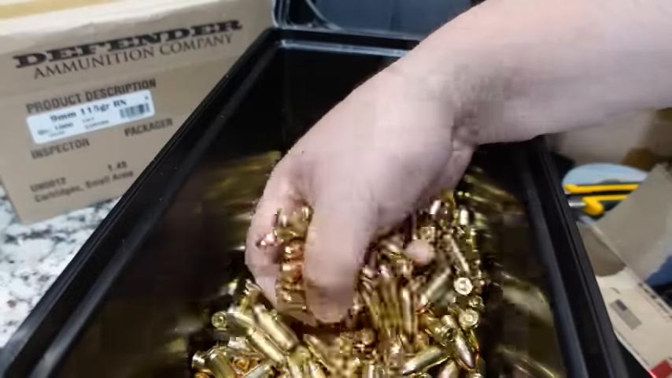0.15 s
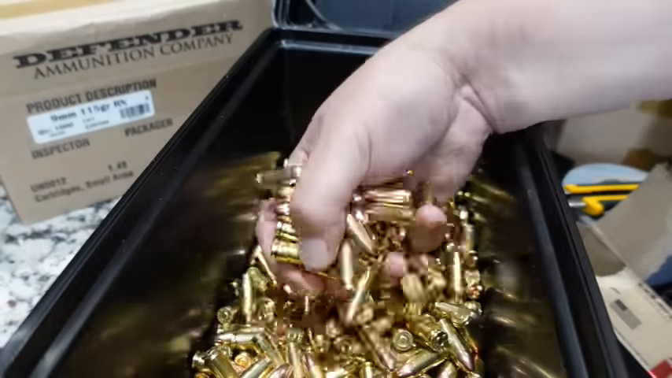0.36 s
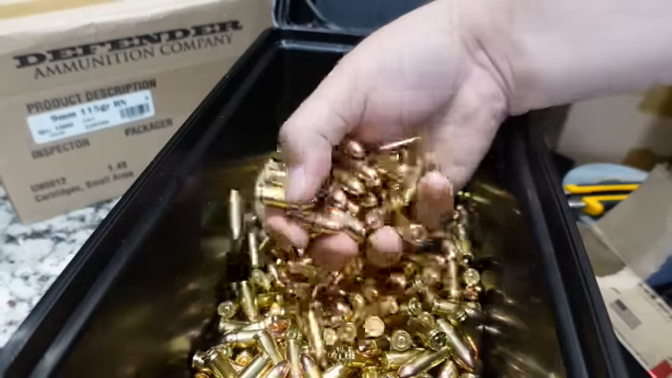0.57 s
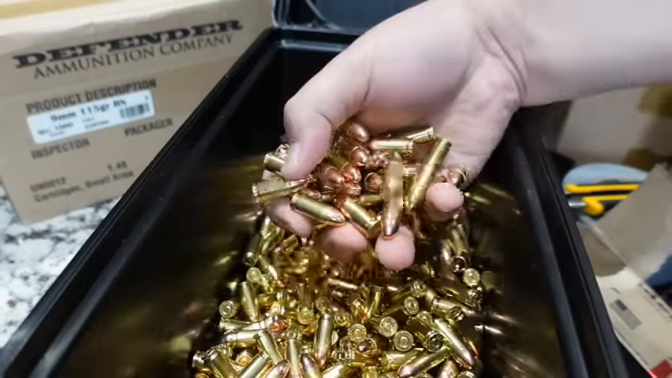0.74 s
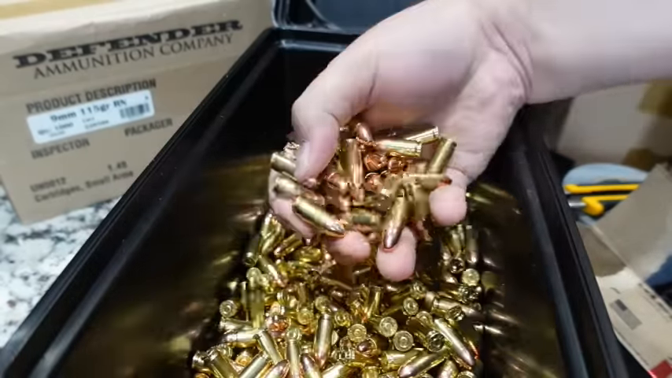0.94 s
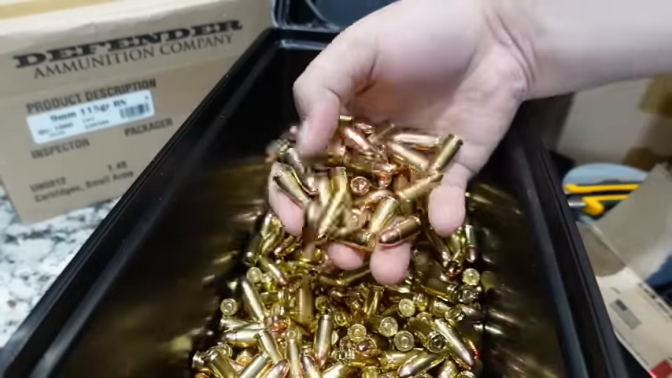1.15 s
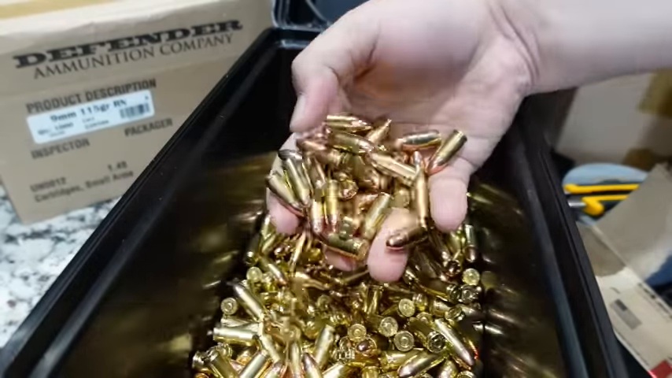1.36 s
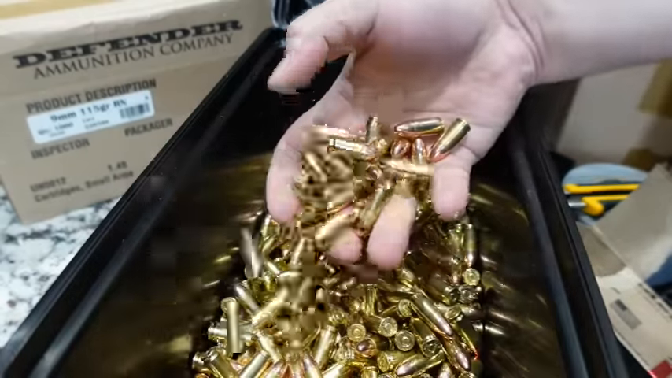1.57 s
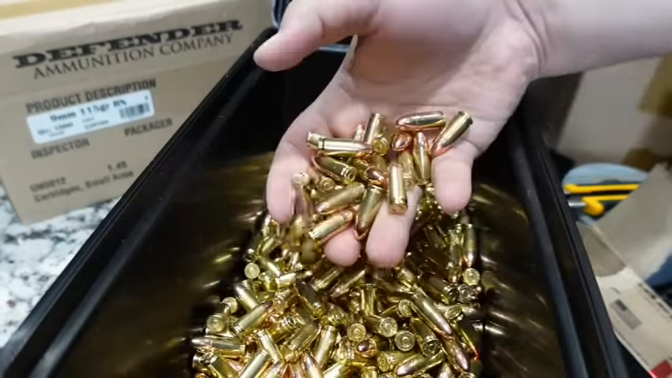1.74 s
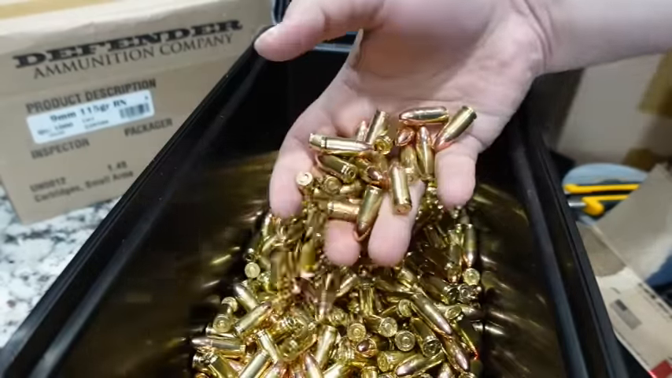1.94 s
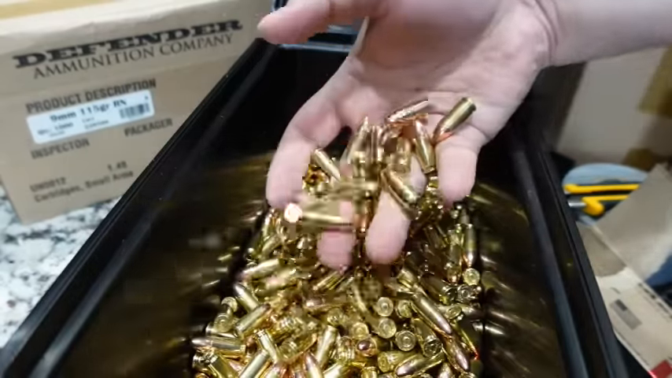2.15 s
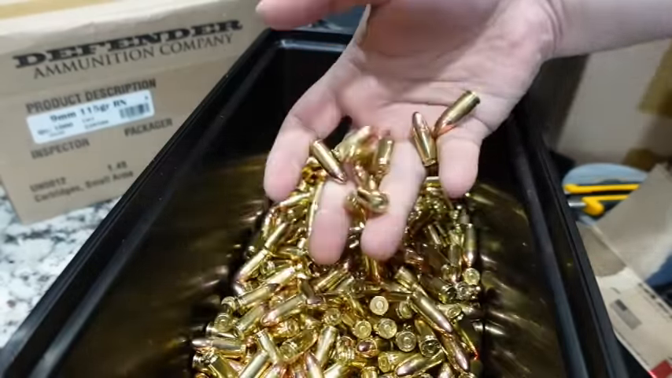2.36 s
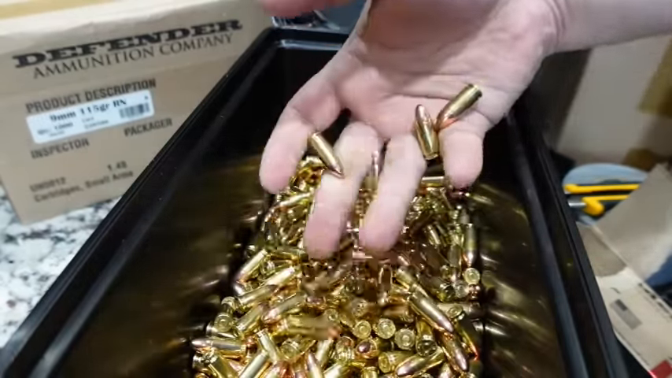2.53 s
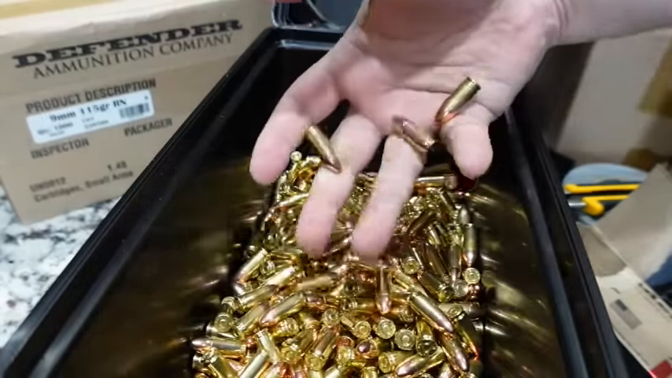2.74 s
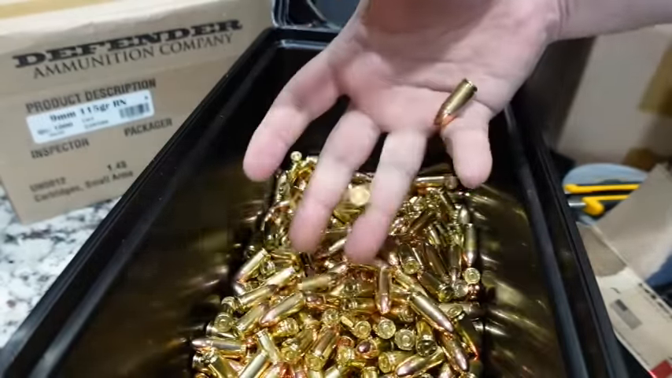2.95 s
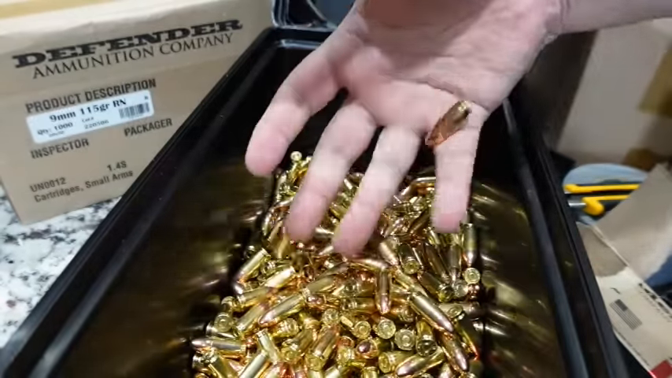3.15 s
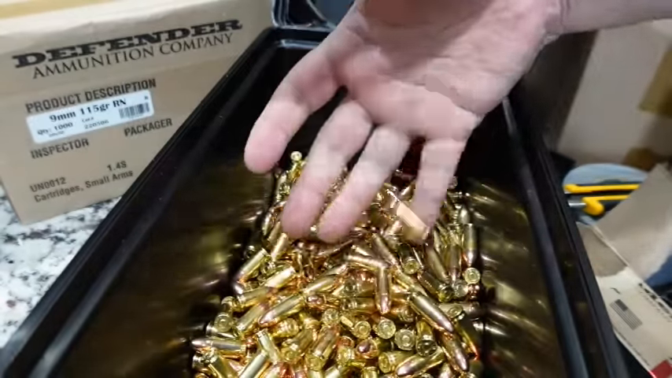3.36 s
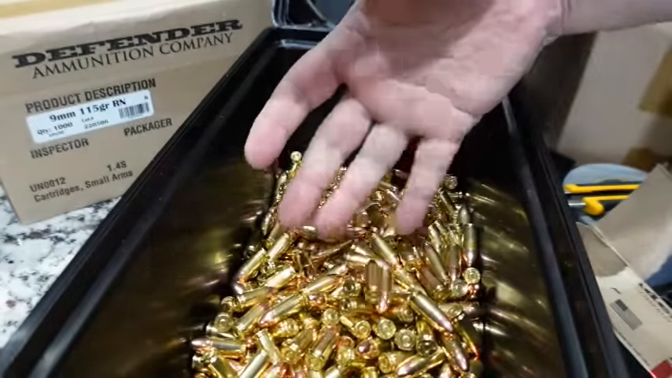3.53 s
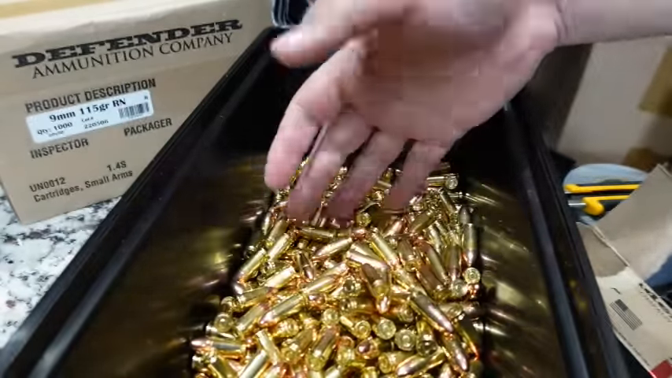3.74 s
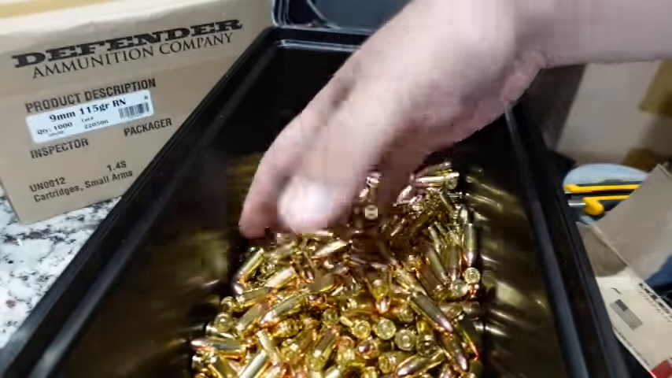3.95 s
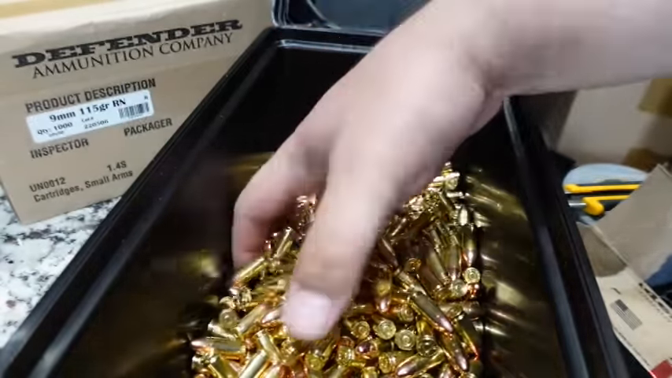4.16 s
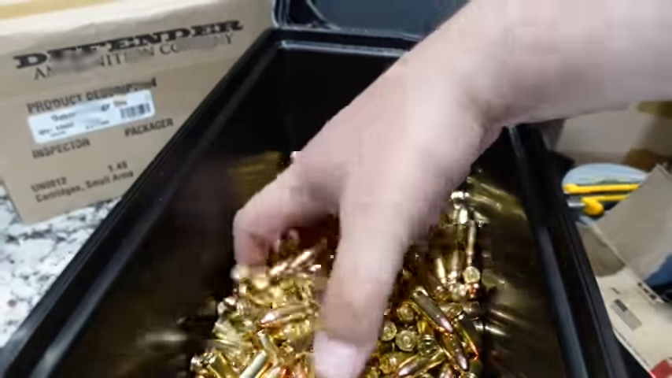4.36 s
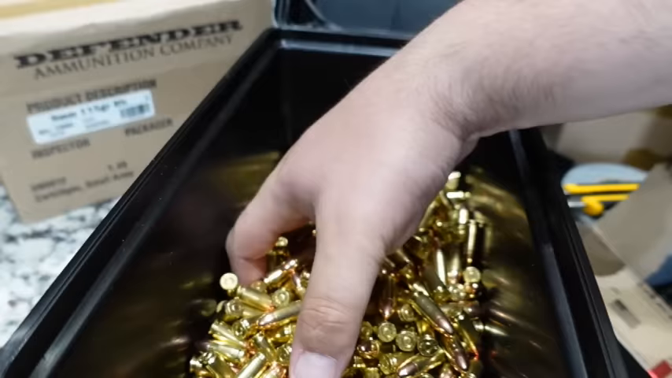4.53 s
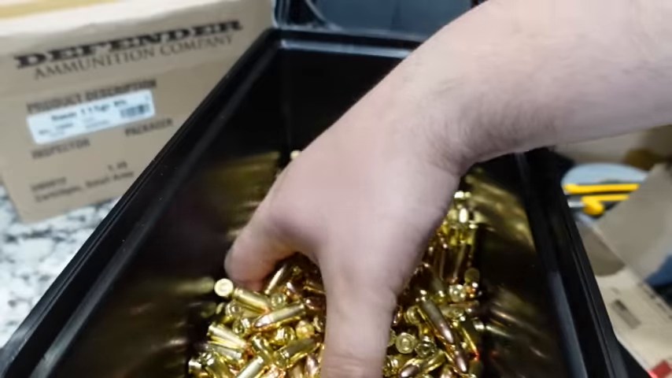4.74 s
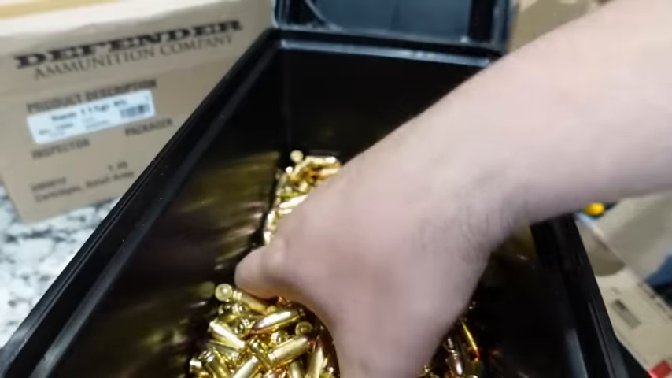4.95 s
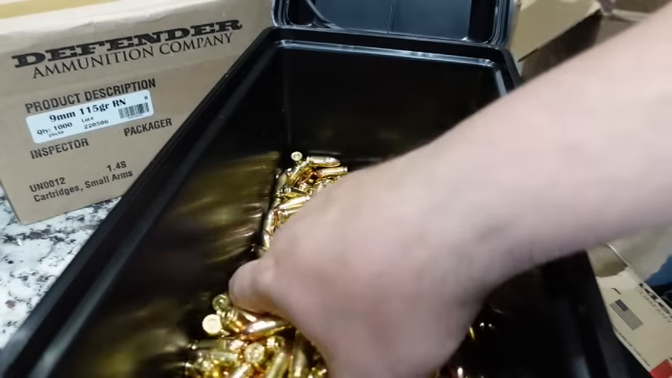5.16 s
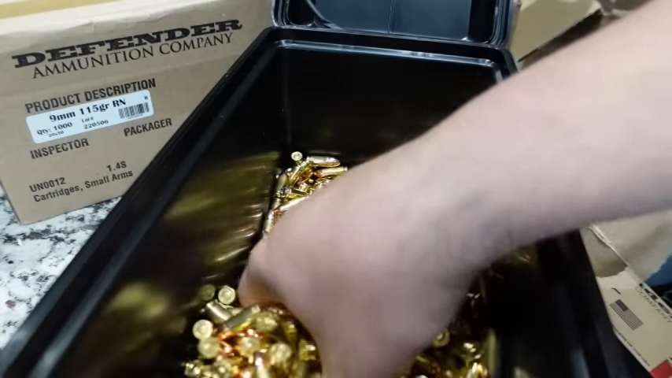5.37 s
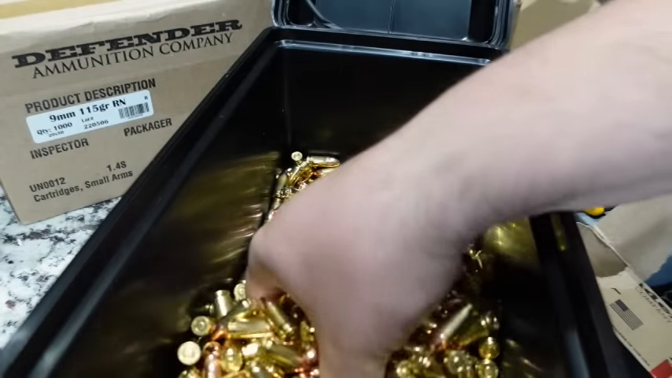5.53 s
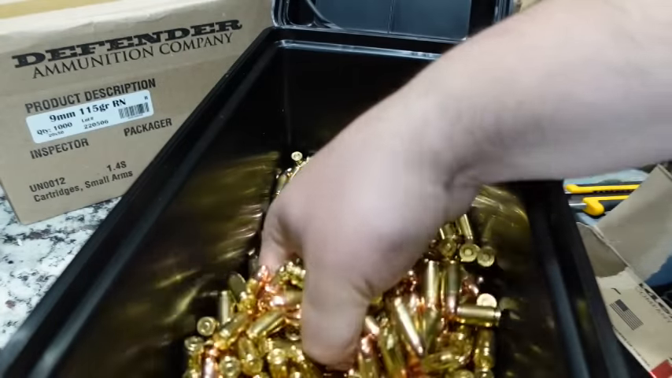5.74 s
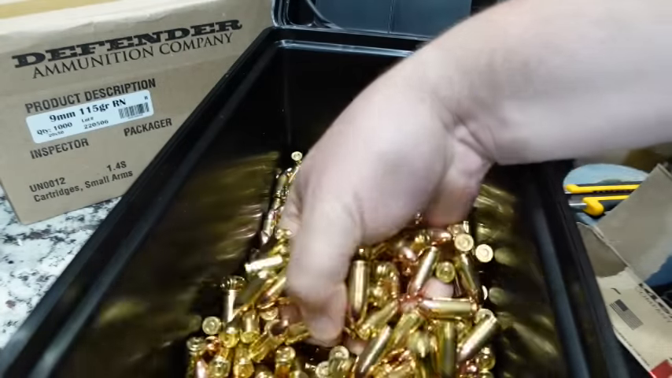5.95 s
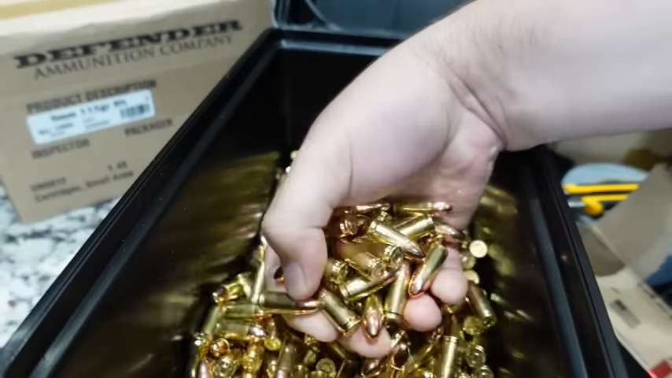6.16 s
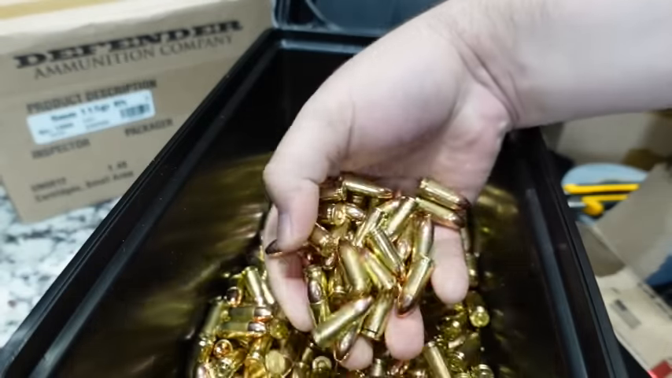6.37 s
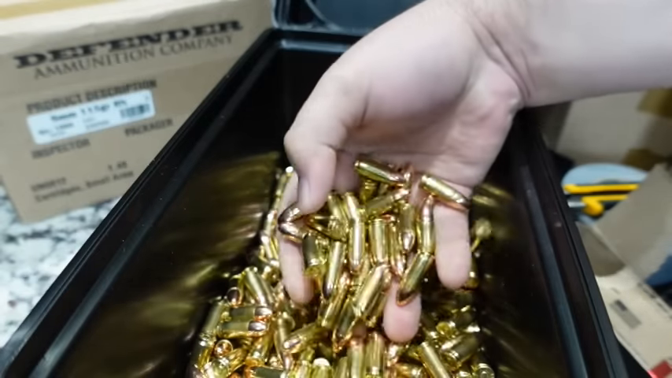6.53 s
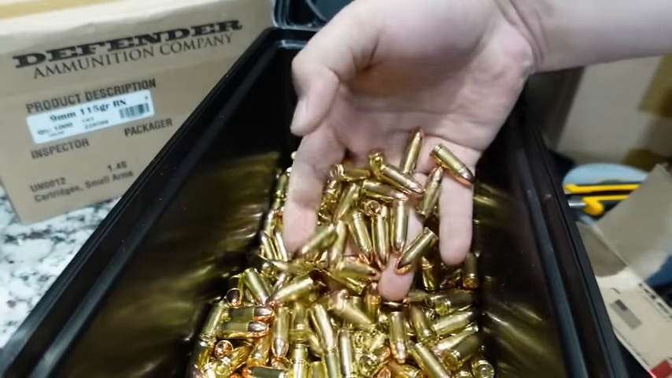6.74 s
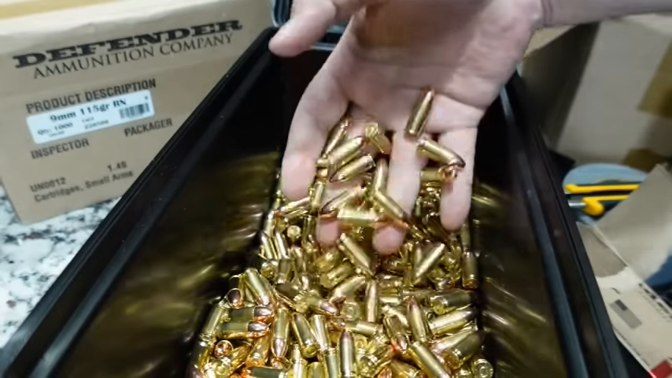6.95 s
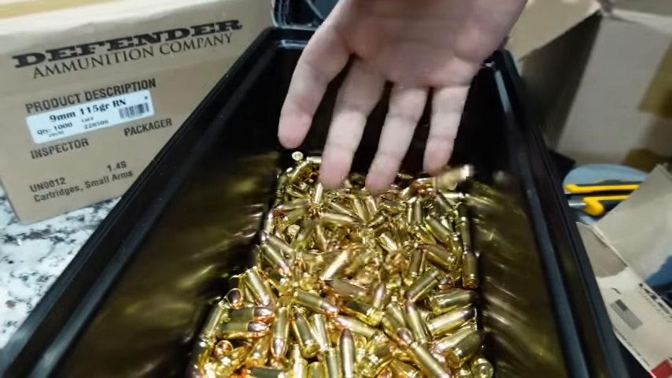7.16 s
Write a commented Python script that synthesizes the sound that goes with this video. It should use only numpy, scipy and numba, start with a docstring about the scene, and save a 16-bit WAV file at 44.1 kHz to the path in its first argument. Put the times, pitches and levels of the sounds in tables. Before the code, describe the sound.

Close-up indoor handling of loose brass cartridges in a plastic can, dry and bright with a short hollow boxy resonance. From 0 to 0.45 s a hand churns the heap in a dense rattle and lifts a handful. From 0.5 to 2.65 s cartridges drop back in quick, irregular hard clacks and high ticks, strongest around 0.5-1.3 s. It thins to faint stray clinks by 2.7-2.9 s, then scattered small drops until 3.55 s and a near-silent gap with faint hum. From 3.75 s light rustling ticks grow as fingers dig in; a dull low knock on the can floor comes near 4.36 s. Brief scrapes follow, then thick, loud, gritty churning from about 4.9 to 6.3 s. Separate clacks spill again from 6.05 to 6.7 s, with a last loud tumble just after 7 s. Small-room tail throughout.

```python
"""Dry cracks and a churning rattle: a hand digs into loose brass cartridges in a plastic can, lifts
a handful and lets them drop back, twice. Each contact is a short burst of noise with case rings;
decaying modes sound the can's walls, floor and air. A knock on the can floor is heard on the way.
Behind lie a small room, as a decaying noise tail, and a faint hum, as steady coloured noise.
The microphone pair is close, and a limiter holds the peaks down."""
import sys
import numpy as np
from scipy import signal
from scipy.fft import rfft, irfft, next_fast_len
from scipy.io import wavfile
from scipy.ndimage import uniform_filter1d
from numba import njit

SR = 44100
rng = np.random.default_rng(int(sys.argv[2]) if len(sys.argv) > 2 else 0)


def file_out(sig):
    """Save sig as 16-bit WAV at sys.argv[1]."""
    # one column per channel
    cols = np.atleast_2d(sig).T
    # limit, then scale
    lim = np.clip(cols, -1, 1)
    pcm = np.round(lim * 32767).astype(np.int16)
    wavfile.write(sys.argv[1], SR, pcm)


N = 317383   # samples in the scene
SPOTS, RING = 160, 2048   # places in the heap; samples generated for one contact
ONSET = 441   # samples in the first 10 ms
STEP = 32   # samples between updates of the hand's motion


def from_db(db):
    """dB to gain."""
    return 10 ** (np.asarray(db) / 20)


def rms_one(x):
    """Scale to rms 1."""
    return x / np.sqrt(np.mean(x ** 2) + 1e-20)


def energy_one(rows):
    """Scale so that the rows have a mean energy of 1."""
    return rows / np.sqrt(np.mean(np.sum(rows ** 2, axis=-1)))


def coloured(size, spectrum, count):
    """Rows of noise with the given spectrum, interpolated over log frequency."""
    hz = np.maximum(np.fft.rfftfreq(size, 1 / SR), 10)
    table = np.array(spectrum)
    gain = from_db(np.interp(np.log(hz), np.log(table[:, 0]), table[:, 1]))
    return irfft(rfft(rng.standard_normal((count, size))) * gain, size)


def dying(t60):
    """Envelope of one contact that falls 60 dB in t60 seconds."""
    return from_db(-60 * np.arange(RING) / SR / t60)


# The hum behind the can, as a noise spectrum. Each row: frequency in Hz, relative density in dB per Hz.
HUM_SPECTRUM = [(18, -20), (30, -17), (60, -34), (125, 2.5), (200, -4.5), (260, -5), (1200, -3),
                (2800, -10), (8700, -22), (16000, -48)]
HUM_DB = -48   # rms before the bass and treble cuts


def background_hum():
    """Steady coloured noise, partly different at the two microphones."""
    mid, side = coloured(next_fast_len(N), HUM_SPECTRUM, count=2)[:, :N]
    return from_db(HUM_DB) * rms_one(mid + 0.51 * side * [[1], [-1]])


ROOM_T60_S, ROOM_DB, WALL_CUT_HZ = 0.37, -20, 3500


def room(close):
    """A decaying noise tail, duller than the direct sound, nearly alike at both microphones."""
    t = np.arange(SR // 3) / SR
    envelope = from_db(-60 * t / ROOM_T60_S) * (t > 0.008)   # the tail starts after 8 ms
    mid, side = rng.standard_normal((2, len(t))) * envelope
    dull = signal.butter(1, WALL_CUT_HZ, fs=SR, output="sos")
    tail = signal.sosfilt(dull, mid + 0.14 * side * [[1], [-1]])
    return from_db(ROOM_DB) * signal.oaconvolve(close[None], energy_one(tail), axes=1)[:, :N]


BUMP_S = 4.358   # fingers strike the can floor
# The struck can floor, close by. Each row: frequency in Hz, level in dB, time to fall 60 dB in seconds.
BUMP_MODES = [(137, -31, 0.2), (285, -8.5, 0.023), (490, -12.5, 0.08)]


def hand_bump():
    """A dull knock on the can floor: decaying modes that take a moment to swing."""
    t = np.maximum(np.arange(N) / SR - BUMP_S, 0)
    knock = 0
    for hz, level_db, t60 in BUMP_MODES:
        knock = knock + from_db(level_db - 60 * t / t60) * np.sin(2 * np.pi * hz * t)
    return (1 - from_db(-60 * t / 0.0066)) * knock


def cracks(spectrum, crack_t60, echo_t60, echo_db, top_hz):
    """Each spot's own crack: a sharp snap, a brief burst and slower wall echoes, rolled off above top_hz."""
    shape = dying(0.0046) + dying(crack_t60) + from_db(echo_db) * dying(echo_t60)
    rounded = signal.butter(3, top_hz, fs=SR, output="sos")
    return energy_one(signal.sosfilt(rounded, coloured(RING, spectrum, count=SPOTS) * shape))


def ringing(modes, scatter_db, detune, tilt_db=0):
    """Each spot excites every mode with its own strength and detuning; a tilt makes early spots deeper."""
    out, t = 0, np.arange(RING) / SR
    height = np.linspace(-1, 1, SPOTS)[:, None]
    for hz, level_db, t60 in modes:
        strength, shift, sign = rng.standard_normal((3, SPOTS, 1))
        wave = np.sin(2 * np.pi * hz * (1 + detune * shift) * t) * np.sign(sign)
        tilted_db = tilt_db * height * np.log2(hz / modes[0][0])
        out = out + from_db(level_db + scatter_db * strength + tilted_db) * wave * dying(t60)
    if tilt_db:
        return out / np.linalg.norm(out, axis=1, keepdims=True)   # every spot equally strong
    return energy_one(out)


def small_radiator(rows, hz):
    """A small body radiates little below its lowest mode."""
    return energy_one(signal.sosfilt(signal.butter(3, hz, "high", fs=SR, output="sos"), rows))


# Brass contact noise heard close: the main clack, the brighter tick and the finest sheen.
# Each row: frequency in Hz, relative density in dB per Hz.
CLACK_SPECTRUM = [(800, -3.5), (1500, -10.5), (2200, 0.5), (3000, 2.5), (4200, 1), (5500, -5.5),
                  (8000, -45)]
TICK_SPECTRUM = [(3500, -31), (5500, 5.5), (7500, 6), (9500, 0), (12500, -24)]
SHEEN_SPECTRUM = [(7500, -21), (10000, 1), (12500, -7), (15000, -12), (16500, -32)]
# Resonances of the brass cases, the can's upper air, its low walls and its floor.
# Each row: frequency in Hz, relative level in dB, time to fall 60 dB in seconds.
CASE_MODES = [(2620, 5, 0.022), (3150, 0, 0.013), (3750, 2, 0.016)]
AIR_MODES = [(1162, -7.5, 0.031), (1543, -2, 0.026), (1654, -3.5, 0.02), (1914, -2, 0.021)]
WALL_MODES = [(336, -20, 0.037), (412.6, -8, 0.039), (479, -2, 0.038), (619, -2, 0.025), (697.8, -3, 0.048),
              (767, 5.5, 0.0096)]
FLOOR_MODES = [(130, -3, 0.21), (216.6, 2, 0.13), (299, 23.5, 0.037)]


def brass():
    """The clack, can air, boom, tick, sheen and floor thud of a contact at every spot."""
    swing = 1 - dying(0.012)   # the walls take a moment to swing
    cases = ringing(CASE_MODES, scatter_db=5.5, detune=0.05)   # no two cases ring alike
    snap = cracks(CLACK_SPECTRUM, 0.018, 0.075, echo_db=-16, top_hz=7700)
    # the shifting load detunes the can's modes
    air = ringing(AIR_MODES, scatter_db=3.0, detune=0.033)
    walls = ringing(WALL_MODES, scatter_db=4.0, detune=0.044, tilt_db=13.0)
    floor = ringing(FLOOR_MODES, scatter_db=4.0, detune=0.043)
    return np.array([small_radiator(snap + from_db(-6) * cases, hz=920),
                     small_radiator(air, hz=750),
                     small_radiator(walls * swing, hz=307),
                     cracks(TICK_SPECTRUM, 0.016, 0.15, echo_db=-19.0, top_hz=10500),
                     cracks(SHEEN_SPECTRUM, 0.013, 0.044, echo_db=-12, top_hz=14700),
                     small_radiator(floor * swing, hz=110)])


# Movements of the hand in the heap or shaking a handful out, close to the microphones.
# Each row: start in seconds, length in seconds, clack level in dB at start, clack level in dB at end,
# depth from 0 open to 1 buried, boom against clack in dB, floor thud against boom in dB.
HAND_STIRS = [(-0.04, 0.47, -10.5, -14.5, 0.71, -7, -24), (0.424, 0.35, -18, -18, 0.14, -6, -16.5),
              (0.89, 0.15, -44, -18, 0.15, -12, -23), (1.21, 0.24, -18, -27.5, 0.066, -5.5, -14.5),
              (1.444, 0.53, -10, -38.5, 0.13, -4.5, -24), (1.808, 0.11, -57, -21.5, 0.05, -3.5, -21),
              (1.987, 0.11, -50, -21, 0.041, -17, -22), (2.136, 0.39, -18, -20.5, .1, -4, -22),
              (2.96, 0.56, -57, -44.5, 0.35, 3, -17.5), (3.799, 0.069, -29.5, -29, 1, -6, -15),
              (3.906, 0.23, -24.5, -20, 1, -10.5, -18.5), (4.19, 0.085, -16, -13, 1, -9.5, -23),
              (4.335, 0.058, -7, -14.5, 0.75, -8, -24), (4.582, 0.04, -17, -15.5, 0.99, -8, -21.5),
              (4.8, 0.2, -26.5, -10.5, 1, -6, -24), (5.103, 0.51, -14.5, -9, 0.98, -9, -31),
              (5.633, 0.32, -9, -12.5, 0.81, -7.5, -37), (5.958, 0.35, -8.5, -20.5, 0.71, -4, -22),
              (6.387, 0.4, -26.5, -18.5, 0.23, -8, -25.5), (6.66, 0.41, -24, -16.5, 0.3, -6.5, -31),
              (7.048, 0.19, -5, -20, 0.37, -10.5, -37)]
STIR_ATTACK_S, STIR_RELEASE_DB_S = 0.05, 126


def motion():
    """Clack power of the stirring, with depth, boom and thud weighted by each stir's power."""
    t, powers = np.arange(1, N + STEP, STEP) / SR, []
    for start, length, first_db, last_db, *_ in HAND_STIRS:
        level_db = np.interp(t, [start, start + length], [first_db, last_db])
        level_db -= STIR_RELEASE_DB_S * np.maximum(t - start - length, 0)
        attack = np.clip((t - start) / STIR_ATTACK_S, 0, 1)
        powers.append((from_db(level_db) * attack) ** 2)
    stirring = np.sum(powers, axis=0) + 1e-90
    manner = np.array(HAND_STIRS)[:, 4:].T @ powers / stirring
    return np.repeat([stirring, *manner], STEP, axis=1)[:, :N]


LUMPS_PER_S, LUMP_DB = 35, 3


def lumps():
    """The heap gives way in lumps: a random swell of the churn's power, mean 1."""
    knots = rng.standard_normal(N // STEP)
    swell = np.interp(np.arange(N) / SR * LUMPS_PER_S, np.arange(len(knots)), knots)
    return rms_one(from_db(LUMP_DB * swell)) ** 2


SETTLE_DB, SETTLE_T60_S = -10, 0.18   # energy of the rattle against the landing's; its decay


def settling(starts, gains):
    """Power of each part as neighbours rattle on after every landing, in that landing's colour."""
    kicks = np.full((len(gains), N), 1e-18)
    kicks[:, starts] = (gains * from_db(SETTLE_DB)) ** 2
    keep = from_db(-2 * 60 / SETTLE_T60_S / SR)   # power kept from sample to sample
    return signal.lfilter([1 - keep], [1, -keep], kicks)


# Pairs: fingers in the open, fingers buried deep
CONTACTS_PER_S = (600, 1800)
TICK_DB = (-2.5, -8.5)   # against the clack
SHEEN_DB = (-5, -11)   # against the tick
# Can air heard while stirring. Each row: time in seconds, level against the boom in dB.
STIR_AIR = [(0, 1.5), (2.6, 2.5), (4.0, 0), (5.5, 0.5), (6.1, 2.5), (6.6, -3), (7.2, 4.5)]


def churn(state, settle, spread_db, colour_db, rim_db):
    """Start and part gains of small contacts: random in time, most weak, a few strong, each coloured."""
    per_s = np.interp(state[1], [0, 1], CONTACTS_PER_S)
    starts = np.flatnonzero(rng.random(N) < per_s / SR)
    size = rng.exponential(1, N)[starts]
    tilt, top, rim = rng.standard_normal((3, N))[:, starts]
    stirring, buried, boom_db, thud_db = (curve[starts] for curve in state)
    tick_db = np.interp(buried, [0, 1], TICK_DB)
    sheen_db = tick_db + np.interp(buried, [0, 1], SHEEN_DB)
    air_db = boom_db + np.interp(starts / SR, *np.transpose(STIR_AIR))
    parts_db = [0 * boom_db, air_db, boom_db, tick_db, sheen_db, boom_db + thud_db]
    power = stirring * lumps()[starts] * from_db(parts_db) ** 2
    size = rms_one(from_db(spread_db * np.minimum(size, 4)))
    hollow = rms_one(from_db(colour_db * tilt))   # contacts near the walls wake the can more
    exposed = rms_one(from_db(colour_db * top))   # bright ticks come mostly from the open top of the heap
    glancing = rms_one(from_db(rim_db * rim))   # rim on rim gives the finest sheen
    colour = np.array([1 + 0 * size, hollow, hollow, exposed, exposed * glancing, hollow])
    total = power * (size * colour) ** 2 + settle[:, starts]   # the settling is even
    return starts, np.sqrt(total * SR / per_s[starts])


# Single cartridges landing in the can, close by, before room and limiter. Each row: time in seconds,
# clack peak in dB, then boom, tick and can air, each in dB as rms of the first 10 ms.
LANDINGS = [(0.088, -2, -14, -27, -18), (0.122, 0, -24.5, -22, -22), (0.2152, 2, -16.5, -18, -15),
            (0.314, -7, -12, -25, -17), (0.387, -11, -24.5, -14, -25), (0.491, 1, -13, -21, -19),
            (0.5148, 4, -4.5, -12, -11), (0.5328, -2, -13, -10, -14), (0.5564, 9.5, -16.5, -14, -12),
            (0.5808, 4, -10, -29, -15), (0.615, -1, -12, -21, -17), (0.6343, 0, -10, -27, -15),
            (0.661, 5, -12.5, -17, -8.5), (0.726, 0, -19.5, -25, -24), (0.738, 6.5, -13.5, -26, -17),
            (0.76, 6.5, -26, -21, -25), (0.7955, 0, -44, -18, -23), (0.8316, 6, -30, -18, -16),
            (0.858, 3, -11.5, -31, -10), (0.88, -4, -12, -22, -9.5), (0.9, 2, -14.5, -20, -13),
            (0.9358, -10, -24.5, -23, -28), (0.951, -2, -9.5, -27, -11), (0.964, 3.5, -16, -18.5, -14),
            (0.9971, -7, -15.5, -24, -16), (1.0191, 2, -13, -19, -14.5), (1.051, -13, -22, -15, -19),
            (1.076, 0.5, -16.5, -19, -16), (1.1025, -0.5, -18, -16.5, -17.5), (1.135, -20, -45, -32, -39),
            (1.1935, 1, -24.5, -10, -18), (1.2335, 2, -17.5, -16, -13), (1.239, 5, -11, -18, -15),
            (1.26, 7, -10.5, -15, -7.5), (1.291, 2, -13.5, -19, -16), (1.3304, -4, -25, -24, -20),
            (1.3593, -3, -22.5, -22, -21), (1.385, 0, -29, -13, -16), (1.4158, -6, -35, -25, -17),
            (1.4344, -6.5, -43, -29, -22), (1.4659, 4, -10, -20, -7.5), (1.5184, 0, -30, -23, -28),
            (1.5658, 4, -17, -31, -13), (1.598, -4, -20.5, -12.5, -13), (1.6167, 3, -11.5, -27, -17.5),
            (1.649, 0, -17, -19, -26), (1.6842, -2, -27.5, -18.5, -19), (1.721, 0, -14.5, -22, -15.5),
            (1.737, -8, -25, -23, -15), (1.7771, -6, -42, -29, -29), (1.796, -3.5, -33, -41, -29),
            (1.8266, -3, -26, -17.5, -16.5), (1.866, 3, -21.5, -14, -19), (1.869, -1, -32, -22, -16.5),
            (1.9215, 1, -18.5, -20, -16), (1.9833, 2, -19, -14, -8.5), (2.009, 1, -10.5, -22, -20),
            (2.0376, -1, -25, -23, -29), (2.0599, -5, -13.5, -22.5, -20), (2.0972, -7, -19, -16.5, -15.5),
            (2.127, -5, -21, -10, -22), (2.165, 7, -14, -14.5, -10), (2.1995, 3, -30, -15, -26),
            (2.2157, 2.5, -17, -22, -28), (2.2357, -6, -16.5, -30, -26), (2.295, 4, -20, -14, -25),
            (2.316, 4, -30, -22, -20), (2.3264, -3, -19.5, -19, -20), (2.4055, 1.5, -16.5, -13, -16),
            (2.429, -7, -15, -15, -22), (2.4436, 1, -18, -12, -20), (2.5365, -3, -30, -14, -26),
            (2.5886, -2, -22, -18, -31), (2.6, 5.5, -19.5, -16, -10.5), (2.6218, -1, -18.5, -18, -25),
            (2.629, -2, -20.5, -28, -22), (2.654, 1.5, -22, -11, -18), (2.6775, -13, -29, -33, -31),
            (2.7113, -14, -33, -32, -31), (2.7293, -15, -35, -48, -40), (2.758, -13, -31.5, -31.5, -33),
            (2.776, -24, -32, -48, -29), (2.796, -7, -28.5, -41, -37.5), (2.8066, -21.5, -43, -43, -29.5),
            (2.8615, -21.5, -40, -42, -39), (2.9053, -24, -43, -46, -41), (2.996, -2, -23.5, -21, -24),
            (3.015, -14, -27, -39, -34), (3.021, -4, -25, -22, -19), (3.0445, -1, -23, -14.5, -19),
            (3.0723, -17, -37, -36, -29), (3.0943, 2.5, -18, -18.5, -18.5), (3.1205, -14, -31, -34, -44),
            (3.151, -22, -47, -34, -37), (3.1785, -2, -23, -28, -27), (3.2062, -2.5, -22, -27, -24),
            (3.2559, -10.5, -35, -33.5, -28), (3.263, -15, -50, -49, -46), (3.274, -25, -47, -53, -33),
            (3.3519, -9, -20.5, -32.5, -27), (3.39, -12, -40, -56, -34), (3.401, -12, -31, -23.5, -33),
            (3.4135, -4, -23, -14, -11.5), (3.417, -6, -34, -18, -26), (3.431, -19, -48, -41, -33),
            (3.465, -21, -41, -35, -32), (3.4982, -18, -32, -37, -33), (3.5099, -8.5, -27, -27.5, -20.5),
            (3.524, -22, -36, -30, -34), (3.5469, -15, -34, -30.5, -24), (3.7668, -25, -58, -51, -50),
            (3.786, -25, -49, -47, -42), (3.8048, -14.5, -33, -42, -44), (3.82, -6.5, -40, -33, -42),
            (3.832, -11, -40, -36, -42), (3.846, -18, -38, -39, -42), (3.8647, -12, -41, -31, -38),
            (3.8792, -13, -29.5, -49, -30), (3.924, -7, -32, -27, -29), (3.934, -8, -26.5, -32, -34),
            (3.978, -13, -33, -39, -43), (3.989, -10, -40, -36, -45), (4.0026, -8, -37, -22, -32),
            (4.0358, -11, -27.5, -29, -42), (4.0748, -7, -32.5, -41, -38), (4.0935, 1, -44, -25, -27),
            (4.1114, -4, -27, -21, -18), (4.146, -6, -29.5, -30, -35), (4.1823, 4.5, -25.5, -20, -13),
            (4.19, 4, -13.5, -16, -21), (4.209, -2, -27, -25, -22), (4.23, -5, -34, -17, -31),
            (4.344, -7, -25, -23, -27), (4.3949, -2, -15.5, -22, -29), (4.421, 4, -13.5, -19, -25),
            (4.4476, -18, -33, -33, -36), (4.51, -15, -40, -49, -45), (4.607, -1.5, -42, -24, -23),
            (4.6328, -1, -33, -26, -36), (4.812, -17, -41, -37, -46), (4.8412, 5.5, -18.5, -17, -47),
            (4.903, -1.5, -21, -22, -25), (5.093, 5, -19, -27, -15.5), (5.1294, 4.5, -16, -23, -19),
            (6.058, 2, -19, -22, -18), (6.1205, -4, -35, -20.5, -20), (6.1591, 1, -17, -22, -23),
            (6.2114, -6, -17.5, -17, -11), (6.251, -9, -37, -17.5, -11), (6.2962, 0, -17.5, -19, -23),
            (6.3236, -7.5, -19.5, -26, -19.5), (6.3767, -2, -20, -13, -23), (6.385, 0, -13, -23, -13),
            (6.395, -5, -32, -12, -26), (6.409, 0, -13, -26, -15.5), (6.4417, -2, -13, -18, -14),
            (6.4702, -2, -34, -13.5, -21), (6.503, -4, -19.5, -15.5, -34), (6.5237, -2, -12, -25, -15),
            (6.553, -8, -13, -22, -12), (6.576, 0, -16, -19, -14), (6.596, -7, -21, -32, -17),
            (6.6195, 0, -22, -21, -13.5), (6.6392, 1.5, -18, -25, -25), (6.671, -5, -30, -36, -26),
            (6.6999, 2, -23, -28, -29), (6.898, -1, -29, -13, -22), (6.9133, 0, -13.5, -8.5, -19),
            (6.978, -7.5, -43, -15, -19), (7.0485, -3, -22.5, -13, -22), (7.0863, -18, -20, -24, -22)]
DROP_SHEEN_DB, DROP_THUD_DB = -3, 2.5   # against the churn's shares of sheen and thud


def drops(state, sounds, spot):
    """Start and part gains of the single landings, each part scaled by its spot's own loudness."""
    s, clack_db, boom_db, tick_db, air_db = np.transpose(LANDINGS)
    starts = np.round(s * SR).astype(np.int64)
    sheen_db = tick_db + np.interp(state[1][starts], [0, 1], SHEEN_DB) + DROP_SHEEN_DB
    thud_db = boom_db + state[3][starts] + DROP_THUD_DB
    levels_db = [clack_db, air_db, boom_db, tick_db, sheen_db, thud_db]
    own = np.sqrt(np.mean(sounds[..., :ONSET] ** 2, axis=2))   # how loud each spot sounds by itself
    own[0] = np.abs(sounds[0]).max(axis=1)   # clacks go by their peak
    return starts, from_db(levels_db) / own[:, spot]


DEEP_BOOM_DB, BOOM_RANGE_DB = -6, 16   # boom level at the deepest spot; fall to the highest


def landing_spots():
    """The heavier the landing, the deeper-sounding its spot; the weakest fall anywhere."""
    boom_db = np.array(LANDINGS)[:, 2]
    height = (DEEP_BOOM_DB - boom_db) / BOOM_RANGE_DB + 0.2 * rng.standard_normal(len(LANDINGS))
    height = np.where(height > 1, rng.random(len(LANDINGS)), np.maximum(height, 0))
    return (1 + height * (SPOTS - 2)).astype(np.int64)


REBOUND_S, REBOUND_DB = (0.0015, 0.007), (-12, -3.5)   # ranges of the second touch's delay and strength


def rebounds(starts, gains, spots):
    """A cartridge lands on one end; the other end or a neighbour strikes a moment later. Gives both."""
    late, hard, where = rng.random((len(starts), 3)).T
    again = starts + (np.interp(late, [0, 1], REBOUND_S) * SR).astype(np.int64)
    near = np.clip(spots + np.where(where > 0.5, 1, -1), 1, SPOTS - 1)
    second_gains = gains * from_db(np.interp(hard, [0, 1], REBOUND_DB))
    return np.r_[starts, again], np.r_[spots, near], np.c_[gains, second_gains]


@njit
def add(out, starts, spots, gains, side_gains, sounds, lasts):
    """Mix in each contact; the path difference between microphones sounds like another spot, weakly."""
    for i in range(len(starts)):
        mid, side = out[0, starts[i]:], out[1, starts[i]:]
        for part in range(sounds.shape[0]):
            near, other = sounds[part, spots[i]], sounds[part, spots[i] - 1]
            gain, side_gain = gains[part, i], gains[part, i] * side_gains[part]
            for k in range(lasts[part]):
                mid[k] += gain * near[k]
                side[k] += side_gain * other[k]


# Width and length of a contact at the microphone pair. The columns of both: clack, can air, boom, tick,
# sheen, floor thud; the first holds side gain against mid in dB, the second the samples played.
PART_SIDE_DB = [-25, -22.5, -23, -21, -17.5, -14.5]
PART_SAMPLES = [1200, 1200, 1700, 1000, 700, 1800]


def heap():
    """Churn and drops share the same brass and can; gives mid and side."""
    out, sounds, spot = np.zeros((2, N + RING)), brass(), rng.integers(1, SPOTS, N)
    state = motion()
    struck = landing_spots()
    landings = drops(state, sounds, struck)
    starts, gains = churn(state, settling(*landings), spread_db=3.5, colour_db=4.0, rim_db=5.0)
    side_gains, lasts = from_db(PART_SIDE_DB), np.array(PART_SAMPLES)
    add(out, starts, spot[starts], gains, side_gains, sounds, lasts)
    add(out, *rebounds(*landings, struck), side_gains, sounds, lasts)
    return out[:, :N]


def scene():
    """The heap close by, the room around it, the hum behind."""
    close, aside = heap()
    close = close + hand_bump()
    return close + aside * [[1], [-1]] + room(close) + background_hum()


LIMIT_DB, RELEASE_DB_S = -3, 371
BASS_CUT_HZ, CUTOFF_HZ = 88, 16300


def record(dry):
    """A fast limiter holds the peaks down; the deep bass and the top are cut."""
    over_db = np.maximum(20 * np.log10(np.abs(dry).max(axis=0) + 1e-9) - LIMIT_DB, 0)
    fall = RELEASE_DB_S * np.arange(N) / SR
    held_db = np.maximum(np.maximum.accumulate(over_db + fall) - fall, 0)   # drops back at a steady rate
    held_db = uniform_filter1d(held_db, size=31, origin=-15)   # looks slightly ahead
    limited = dry * from_db(-held_db)
    bass_cut = signal.sosfilt(signal.butter(2, BASS_CUT_HZ, "high", fs=SR, output="sos"), limited)
    return signal.sosfilt(signal.cheby2(12, 70, CUTOFF_HZ, fs=SR, output="sos"), bass_cut)


dry = scene()
out = record(dry)
file_out(out)
```